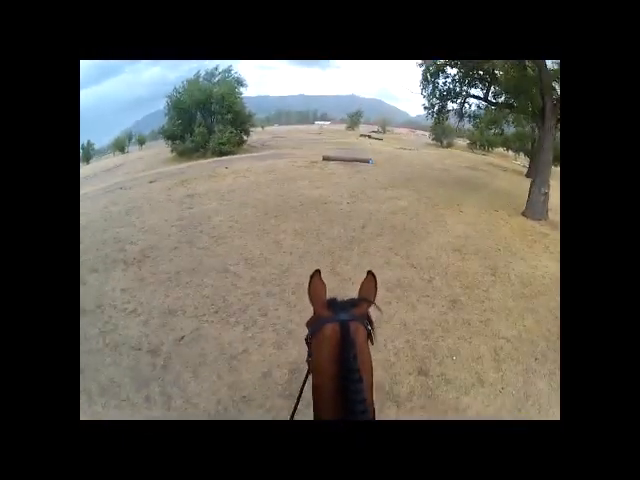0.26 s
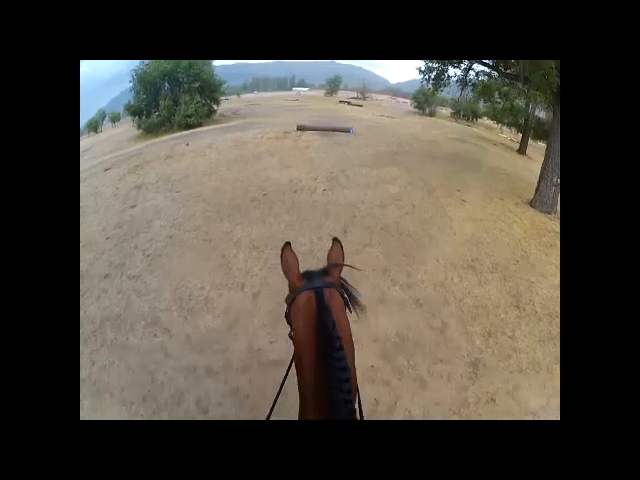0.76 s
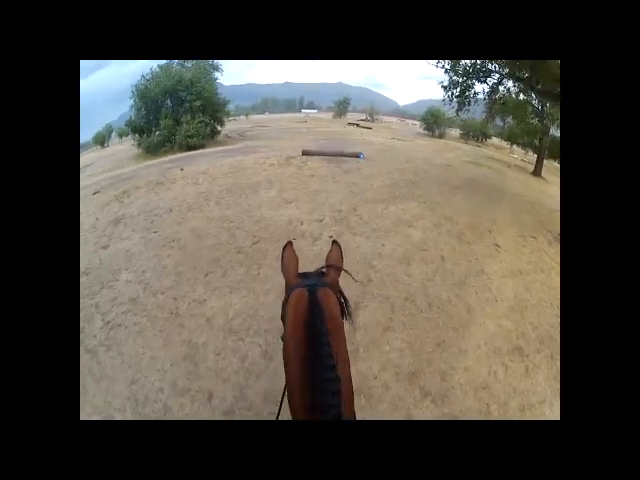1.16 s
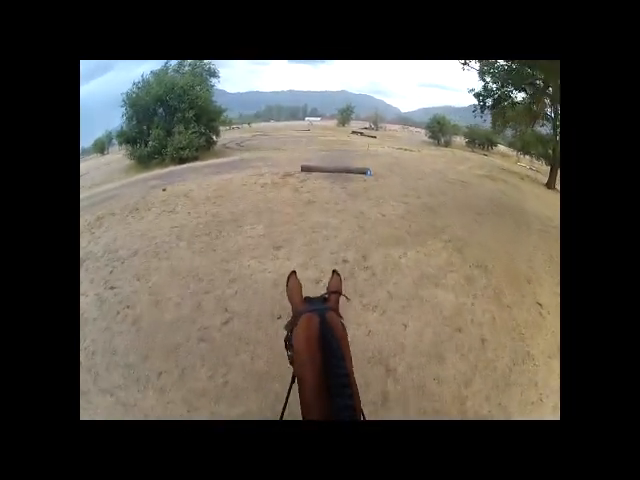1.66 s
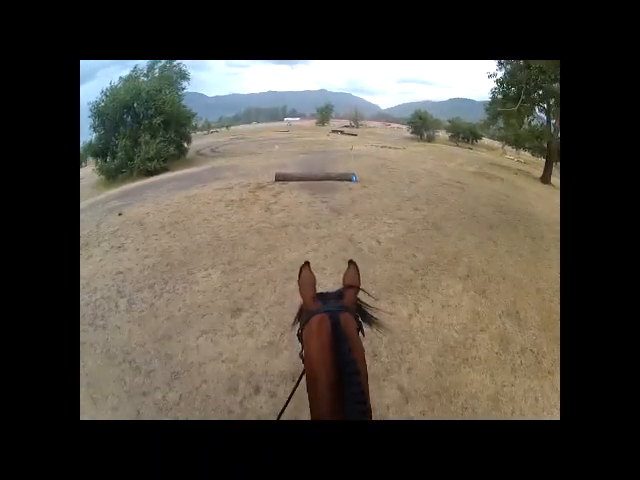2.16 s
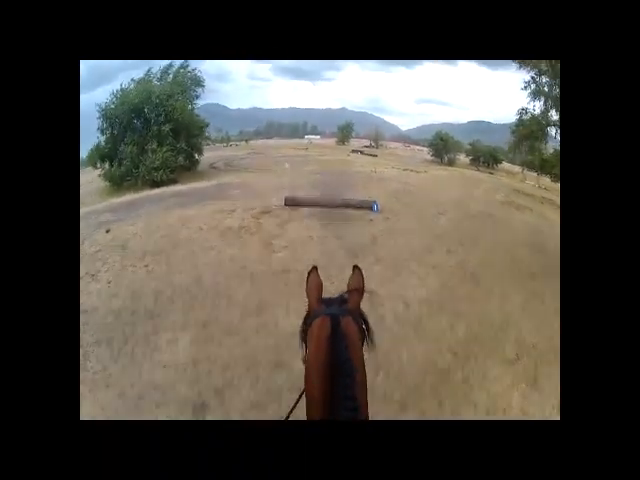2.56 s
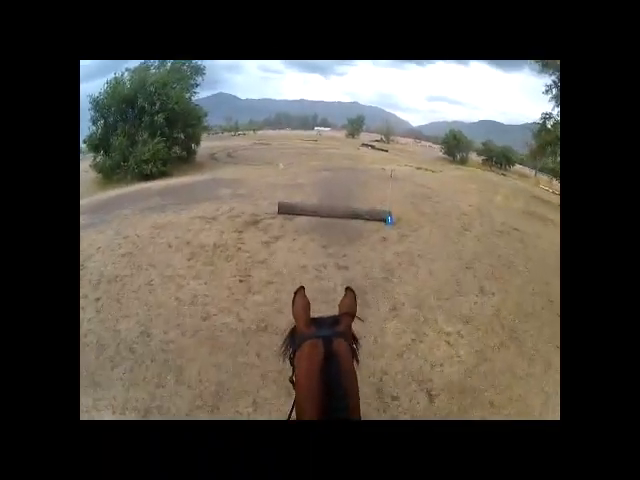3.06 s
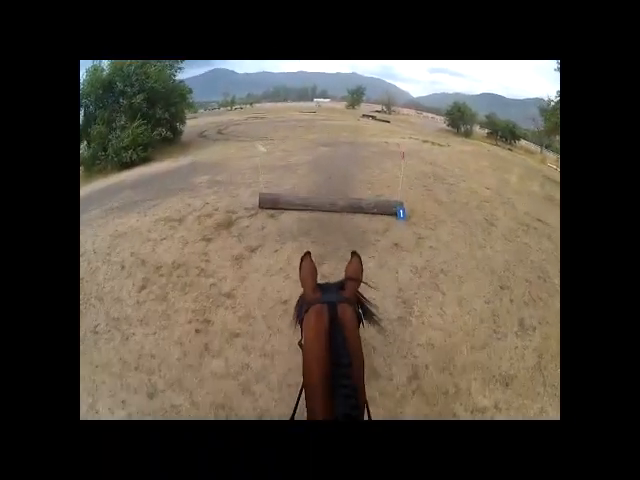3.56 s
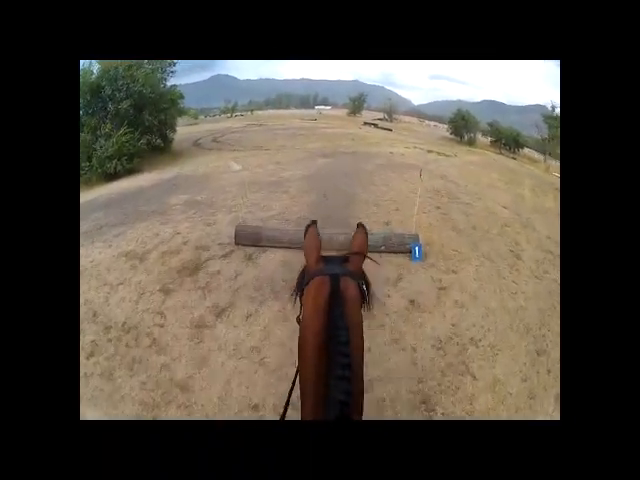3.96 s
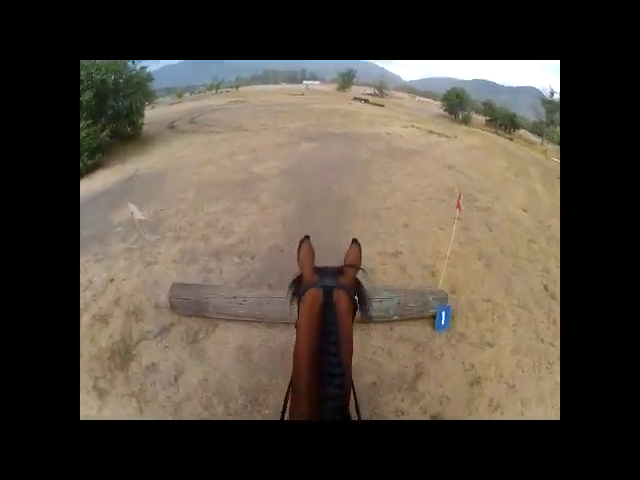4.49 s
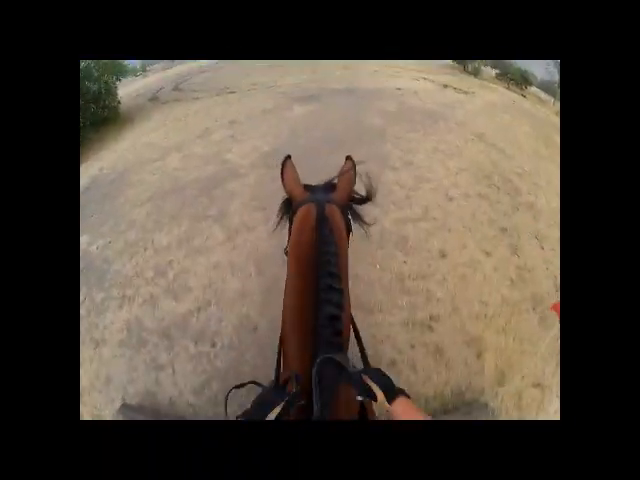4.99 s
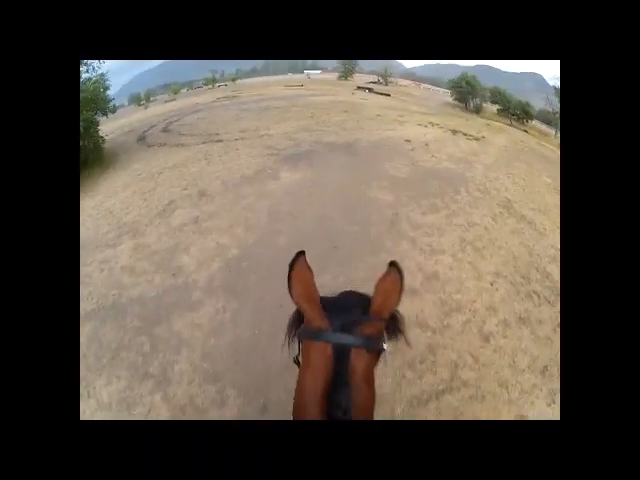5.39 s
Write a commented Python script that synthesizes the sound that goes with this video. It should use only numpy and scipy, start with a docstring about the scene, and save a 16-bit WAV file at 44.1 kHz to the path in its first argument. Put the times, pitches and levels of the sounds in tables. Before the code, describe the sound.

Outdoors, dry and without echo, heard in mono from a camera on the rider's helmet. Low rumble quickly drops to faint air with a barely audible electronic whine. A horse canters on hard ground, its main beats near 0.55, 1.25, 1.95, 2.65, 3.35 and 4.05 seconds: dull low thuds, a wandering bass sway as the helmet rocks, soft grit, and light footfalls between. Short hard knocks of the plastic camera case clack on the beats, crowding into a bright, loud rattle at 2.5-2.7, with strong single clacks around 3.3 and 4.07. Tiny dry stalks snap occasionally. At 4.7-4.95 the jump brings rattling knocks, a sharp gritty skid, heavy clustered thumps and a short spray of dirt. A brief lull follows, then another firm thud near 5.2, a tiny double metallic tack clink at 5.38, and low rumble fading slightly to the end at about 5.6.

```python
"""Hard dry ground: a horse canters and jumps a log, heard from a camera on the rider's helmet.
Strides are short dull pushes that swell and fade evenly; each also sways the helmet as a wandering low tone.
Knocks ring the modes of the plastic camera case, with a thump behind each.
Grit and dirt are sparse random cracks under swells; the tack clinks as damped partials after the landing.
Wind and helmet sway rumble as low shaped noise over steady air, with a faint electronic whine."""
import sys
import numpy as np
from scipy import signal
from scipy.fft import rfft, irfft
from scipy.io import wavfile
from scipy.ndimage import uniform_filter1d

SR = 44100
rng = np.random.default_rng(int(sys.argv[2]) if len(sys.argv) > 2 else 0)


def generate_wav(signal):
    """Clip the signal to [-1, 1] and save it as 16-bit WAV at the path in sys.argv[1]."""
    frames = np.transpose(np.atleast_2d(signal))
    scaled = np.clip(frames, -1, 1) * 32767
    pcm = np.round(scaled).astype(np.int16)
    wavfile.write(sys.argv[1], SR, pcm)


N = 248283

# whine of the camera's electronics: (frequency [Hz], rms level [dB])
WHINE_TONES = [(5040, -86.5), (5088, -86.5), (6912, -90.5), (6960, -88)]
# steady air spectrum: (frequency [Hz], relative level [dB])
AIR_SPECTRUM = [(20, -13), (45, -9), (80, -10.5), (150, -11), (260, -15), (450, -22.5), (900, -28),
                (1600, -31.5), (2500, -31.5), (4000, -37), (5200, -40.5), (6000, -51.5), (7000, -42.5),
                (9000, -42), (11500, -49)]
AIR_RMS_DB = -58.5
# low rumble of wind and helmet sway over time: (time [s], rms level [dB])
RUMBLE_LEVELS = [(0, -34.5), (.15, -53), (2, -52), (2.5, -44.5), (3.2, -51), (3.5, -42.5), (3.8, -53),
                 (4.3, -51.5), (4.6, -40.5), (5.3, -39), (5.63, -45.5)]
# rumble spectrum: (frequency [Hz], relative level [dB])
RUMBLE_SPECTRUM = [(8, -8), (20, -3), (42, -5), (60, -8), (90, -25), (200, -30), (500, -44), (2000, -70.5)]

# clinks of the tack: (time [s], peak level [dB])
CLINK_EVENTS = [(5.378, -29), (5.3794, -23.5), (5.389, -31.5)]
# buckle partials: (frequency [Hz], relative level [dB], 60 dB decay time [s])
BUCKLE_PARTIALS = [(1932, 9, 0.024), (2720, 4, 0.0078), (3560, 8.5, 0.0094), (5100, -33, 0.033),
                   (6960, -27, .03), (8330, -3, 0.016), (10000, -5.5, 0.025)]
# strap snap spectrum: (frequency [Hz], relative level [dB])
SNAP_SPECTRUM = [(500, -12), (1400, 2), (2000, -17), (2900, 8), (4100, -4), (6100, -39), (8300, -3),
                 (10500, -13), (11800, -47)]

# sprays of loose dirt at the landing: (peak time [s], level [dB], rise [s], fall [s])
SPRAY_EVENTS = [(4.889, -37.5, 0.011, 0.023), (5.218, -48, 0.0077, 0.017)]
# spray spectrum: (frequency [Hz], relative level [dB])
SAND_SPECTRUM = [(300, -7), (480, -21), (850, -2), (1300, -0.5), (2100, 0), (3100, -2), (4200, -9.5),
                 (5400, -14), (6200, -17), (7200, -15), (8900, -10), (11000, -20), (12300, -12)]
# grit spectrum: (frequency [Hz], relative level [dB])
GRIT_SPECTRUM = [(200, -7.5), (500, -18), (850, 7), (1400, -6.5), (2300, 3), (3100, -6), (4200, -15.5),
                 (6100, -34.5), (7500, -24.5), (9500, -10.5), (11200, -18.5), (12300, -31)]
# hooves skidding on the grit: (peak time [s], level [dB])
SKID_EVENTS = [(2.505, -46), (2.603, -46.5), (2.681, -31.5), (4.717, -50), (4.812, -19.5)]
SKID_RISE_S, SKID_FALL_S = 0.0083, 0.013
# dry stalks snapping: (time [s], level [dB])
STALK_SNAPS = [(1.089, -59), (3.477, -51), (3.853, -50), (3.885, -51.5), (4.223, -52.5), (4.454, -48.5),
               (5.55, -46.5)]
STALK_RISE_S, STALK_FALL_S = 0.00084, 0.0059

# canter strides: (main beat time [s], weight [dB], grit trim [dB], stretch of the delays [ratio])
STRIDE_EVENTS = [(.560, -2.5, 0.5, 0.95), (1.243, -3, -2.5, 0.92), (1.935, -.5, -0.5, .97),
                 (2.645, 1, 1, 0.98), (3.349, 0, -1, 1.25), (4.066, -1, -1.5, 0.96)]
# thuds in each stride: (delay before stretch [s], level before weight [dB], pitch [Hz], half length [s])
STRIDE_THUD_SHAPES = [(-.037, -23, 76, .0048), (.004, -17.5, 75.9, 0.0037), (.02, -22, 59.6, 0.0026),
                      (.045, -21.5, 86, .0042)]
# helmet rocking in each stride: (delay before stretch [s], level before weight [dB], rise [s], fall [s])
STRIDE_SWAY_SHAPES = [(-.017, -17, 0.021, 0.034), (.032, -21, 0.024, 0.055)]
# grit as hooves reach the ground, bear down and roll off:
# (delay before stretch [s], level before trim [dB], rise [s], fall [s])
STRIDE_CRUNCH_SHAPES = [(-.044, -52.5, 0.018, 0.014), (.005, -55.5, 0.026, 0.081),
                        (.035, -44.5, .009, .014)]
# light footfalls between main beats: (time [s], thud [dB], pitch [Hz], sway [dB], grit [dB])
LIGHT_STEPS = [(0.241, -31.5, 58, -30, -62), (.921, -35, 57, -30, -62), (1.614, -32, 52, -31, -83),
               (2.303, -32.5, 50.7, -27.5, -63.5), (2.986, -21.5, 109, -26.5, -56),
               (3.732, -30.5, 113, -30.5, -59), (4.403, -30.5, 79, -34.5, -61.5),
               (4.475, -31.5, 48.7, -26.5, -64), (5.617, -35, 73.6, -41.5, -57)]
STEP_SWAY_LAG_S, STEP_SWAY_RISE_S, STEP_SWAY_FALL_S = 0.0092, 0.051, 0.06
STEP_GRIT_RISE_S, STEP_GRIT_FALL_S = 0.037, 0.053
# footfalls and jolts of take-off and landing: (time [s], thud [dB], pitch [Hz], sway [dB], grit [dB])
JUMP_JOLTS = [(4.745, -31, 50, -25, -62.5), (4.805, -20.5, 78, -29, -44), (4.837, -12.5, 67, -22, -55),
              (4.878, -16, 107, -34, -42), (4.9, -10, 61, -25, -47), (4.944, -34, 60, -21.5, -56.5),
              (4.975, -27.5, 139, -43, -52.5), (5.1, -37, 57.5, -25.5, -65.5),
              (5.211, -13.5, 105.5, -32, -51.5), (5.239, -26, 56, -19.5, -60),
              (5.405, -38, 49.6, -32.5, -74)]
JUMP_RISE_S, JUMP_FALL_S = 0.021, 0.03
SWAY_HZ = 32.9
# earth around a thud: (frequency [Hz], relative level [dB])
EARTH_SPECTRUM = [(40, -16), (110, -7), (200, 1.5), (280, -4.5), (400, -14.5), (600, -29.5), (1500, -55.5),
                  (4000, -91)]
THUD_HALF_CYCLES = 0.21  # half length of thumps and lone thuds, in cycles of their pitch

# hard knocks of the case:
# (time [s], peak level [dB], brightness [dB], rattle trim [dB], thump peak [dB], thump pitch [Hz])
KNOCK_EVENTS = [(.512, -13.5, 4, -4.5, -19.5, 99), (0.5593, -11, 12.5, -3, -14.5, 112),
                (.597, -33, 6, -10, -29, 101), (1.2424, -10.5, 4, 0, -16.5, 124),
                (1.2828, -29, 7.5, -8, -27.5, 85), (1.893, -35.5, 9, -1, -31.5, 111.3),
                (1.9346, -10.5, 8.5, 2, -13, 145), (1.97, -30.5, -14, 0, -26, 110),
                (2.081, -32.5, 1, -1, -24.5, 154), (2.498, -4, 12, -10.5, -11.5, 135),
                (2.513, -15, 3, -2.5, -17, 138), (2.5891, -16.5, -6, 4, -29.5, 90.5),
                (2.644, -13.5, 4.5, 2, -16, 135), (2.674, -15, -12, 2, -14.5, 73.6),
                (2.6802, -12, 7.5, -7, -23, 100), (2.69, -24, 7, -2, -11, 166),
                (2.973, -36, -1, -2, -35, 112), (2.983, -33.5, 1, 9, -32.5, 110),
                (3.305, -5.5, 3.5, -14.5, -13.5, 99.7), (3.348, -14, 6, 9, -16, 130.6),
                (4.0655, -5.5, 6, -8.5, -18.5, 106), (4.0998, -21.5, -5, -1, -24, 95),
                (4.719, -17.5, 3, -4.5, -23, 128.7), (4.7924, -13, -2.5, -9.5, -27, 89.7),
                (4.8019, -17, -8, 8, -23, 85), (4.81, -17.5, 15, -18, -29, 100),
                (4.825, -19, 4, -10, -17, 125), (5.086, -35.5, 6, -3, -38.5, 242),
                (5.195, -34, 13, -8, -23.5, 136)]
# case resonances: (nominal frequency [Hz], skirt width [Hz], relative level [dB])
CASE_MODES = [(916, 209, 8.5), (1211, 133.7, -3.5), (735.7, 72, -6), (250, 170, -14.5), (1762, 265, -14.5),
              (2350, 260, -26.5), (2840, 233, -24), (3662, 338, -30), (4710, 880, -49), (7200, 409, -49.5),
              (8350, 510, -32.5), (9374, 170, -24.5), (10110, 247, -24), (11020, 430, -18.5)]
# chatter of the plastic surfaces: (frequency [Hz], relative level [dB])
RATTLE_SPECTRUM = [(300, -10), (1000, -10), (2000, 1.5), (12000, -4.5)]
KNOCK_HZ, KNOCK_HZ_PER_DB = 955.7, 3  # first case mode at 0 dB peak; softer knocks ring lower
THUMP_DELAY_S = 0.0047

EDGE_HZ = 12200


def amp(db):
    """Decibels to amplitude."""
    return 10 ** (np.asarray(db) / 20)


def evened(x):
    """Scales x to rms 1."""
    return x / np.sqrt(np.mean(x ** 2) + 1e-20)


def add(mix, time_s, sound):
    """Mixes a sound in at a time, cut at the end of the mix."""
    part = mix[max(round(time_s * SR), 0):][:len(sound)]
    part += sound[:len(part)]


def seconds(size):
    """Time axis of size samples."""
    return np.arange(size) / SR


def coloured(x, points):
    """Filters x by (frequency [Hz], level [dB]) points, then scales to rms 1."""
    hz, db = np.transpose(points)
    f = np.fft.rfftfreq(len(x), 1 / SR)
    gain = amp(np.interp(np.log(f + 1), np.log(hz), db))
    return evened(irfft(rfft(x) * gain, len(x)))


def sparse_grains(grains_per_s):
    """Random cracks at a mean rate."""
    return rng.standard_normal(N) * (rng.random(N) < grains_per_s / SR)


def causal(gain):
    """Minimum-phase impulse response: starts at once, then rings out."""
    log_gain = np.log(np.maximum(gain, 1e-5))
    circle = np.concatenate([log_gain, log_gain[-2:0:-1]])
    return np.fft.ifft(np.exp(np.conj(signal.hilbert(circle)))).real


def swell(time_s, rise_s, fall_s, steepness):
    """Envelope that grows to 1 at time_s and dies away."""
    t = seconds(N)
    distance = np.maximum((time_s - t) / rise_s, (t - time_s) / fall_s)
    return np.exp(-np.minimum(distance, 20) ** steepness)


def whine():
    """Four thin electronic tones in two pairs, 48 Hz apart within each."""
    out = np.zeros(N)
    for hz, db in WHINE_TONES:
        out += amp(db) * evened(np.sin(2 * np.pi * (hz * seconds(N) + rng.random())))
    return out


def wind():
    """Low rumble of wind and helmet sway over a faint steady rush of air."""
    rumble_db = np.interp(seconds(N), *np.transpose(RUMBLE_LEVELS))
    rumble = amp(rumble_db) * coloured(rng.standard_normal(N), RUMBLE_SPECTRUM)
    air = amp(AIR_RMS_DB) * coloured(rng.standard_normal(N), AIR_SPECTRUM)
    return rumble + air


def tack(snap_db=2, snap_decay_s=0.0039, size=4096):
    """A small metal buckle snaps against its strap and bounces: damped partials plus a noise snap."""
    out, t = np.zeros(N), seconds(size)
    for time_s, peak_db in CLINK_EVENTS:
        ring = np.zeros(size)
        for hz, db, t60_s in BUCKLE_PARTIALS:
            ring += amp(db) * 1e-3 ** (t / t60_s) * np.sin(2 * np.pi * (hz * t + rng.random()))
        snap = coloured(rng.standard_normal(size), SNAP_SPECTRUM) * np.exp(-t / snap_decay_s)
        clink = ring + amp(snap_db) * snap
        add(out, time_s, amp(peak_db) * clink / abs(clink).max())
    return out


def spray(grains_per_s=4500):
    """Fine grains fly in short hissing sheets that start and stop quickly."""
    level = sum(amp(db) * swell(s, rise, fall, steepness=2.4) for s, db, rise, fall in SPRAY_EVENTS)
    return level * coloured(sparse_grains(grains_per_s), SAND_SPECTRUM)


def crunches():
    """Hoof, skid and stalk crunches as (time [s], level [dB], rise [s], fall [s])."""
    rows = []
    for s, _, trim_db, stretch in STRIDE_EVENTS:
        for delay, db, rise, fall in STRIDE_CRUNCH_SHAPES:
            rows.append((s + stretch * delay, db + trim_db, rise, fall))
    rows += [(s, db, STEP_GRIT_RISE_S, STEP_GRIT_FALL_S) for s, *_, db in LIGHT_STEPS]
    rows += [(s, db, JUMP_RISE_S, JUMP_FALL_S) for s, *_, db in JUMP_JOLTS]
    rows += [(s, db, SKID_RISE_S, SKID_FALL_S) for s, db in SKID_EVENTS]
    return rows + [(s, db, STALK_RISE_S, STALK_FALL_S) for s, db in STALK_SNAPS]


def grit(grains_per_s=2200, smooth=0.46, level_db=-1, clump_samples=200, clump_db=4.0):
    """Dense tiny cracks of dry soil and grass, in clumps that swell and fade under each hoof."""
    power = np.zeros(N)
    for s, db, rise, fall in crunches():
        power += (amp(db) * swell(s, rise, fall, steepness=1.34)) ** 2
    cracks = evened(sparse_grains(grains_per_s))
    clumps = amp(clump_db * evened(uniform_filter1d(rng.standard_normal(N), clump_samples)))
    texture = coloured(clumps * cracks + smooth * rng.standard_normal(N), GRIT_SPECTRUM)
    return amp(level_db) * np.sqrt(power) * texture


def sways():
    """Helmet rockings as (time [s], level [dB], rise [s], fall [s]): slow on steps, abrupt in the jump."""
    rows = []
    for s, weight_db, _, stretch in STRIDE_EVENTS:
        for delay, db, rise, fall in STRIDE_SWAY_SHAPES:
            rows.append((s + stretch * delay, db + weight_db, rise, fall))
    rows += [(s + STEP_SWAY_LAG_S, db, STEP_SWAY_RISE_S, STEP_SWAY_FALL_S)
             for s, _, _, db, _ in LIGHT_STEPS]
    return rows + [(s, db, JUMP_RISE_S, JUMP_FALL_S) for s, _, _, db, _ in JUMP_JOLTS]


def sway(wander=0.3, level_db=-1, smooth_samples=1100):
    """The helmet dips at each footfall and rocks on its padding at an uneven low rate."""
    noise = uniform_filter1d(rng.standard_normal(N), smooth_samples)
    drift = evened(uniform_filter1d(noise, smooth_samples))
    turns = np.cumsum(SWAY_HZ * (1 + wander * drift)) / SR
    out = np.zeros(N)
    for s, db, rise, fall in sways():
        # each rocking is at its lowest at time s
        rocking = -np.sqrt(2) * np.cos(2 * np.pi * (turns - np.interp(s, seconds(N), turns)))
        envelope = uniform_filter1d(swell(s, rise, fall, steepness=1.25), smooth_samples // 4)
        out += amp(db + level_db) * envelope * rocking
    return out


def thuds():
    """Stride, footfall and knock thuds as (time [s], push peak [dB], pitch [Hz], half length [s])."""
    rows = []
    for s, weight_db, _, stretch in STRIDE_EVENTS:
        for delay, db, hz, half_s in STRIDE_THUD_SHAPES:
            rows.append((s + stretch * delay, db + weight_db, hz, half_s))
    rows += [(s, db, hz, THUD_HALF_CYCLES / hz) for s, db, hz, _, _ in LIGHT_STEPS + JUMP_JOLTS]
    return rows + [(s + THUMP_DELAY_S, db, hz, THUD_HALF_CYCLES / hz) for s, *_, db, hz in KNOCK_EVENTS]


def footfalls(earth_db=-19, spread=2.0, size=8192):
    """Each thud is a dull push and rebound with a longer, coarse rumble of earth around it."""
    out, t = np.zeros(N), seconds(size) - size / 2 / SR
    for time_s, peak_db, hz, half_s in thuds():
        push = np.sin(2 * np.pi * hz * t) / np.cosh(t / half_s)
        earth = coloured(rng.standard_normal(size), EARTH_SPECTRUM) / np.cosh(t / (spread * half_s))
        thud = push / abs(push).max() + amp(earth_db) * earth
        add(out, time_s + t[0], amp(peak_db) * thud)
    return out


def knocks(scatter_db=3.03, rattle_decay_s=0.0017, skirt_power=1.864, chatter_db=4,
           top_share=0.45, size=2048, main_count=3):
    """A sharp contact and a brief rattle ring the case; a harder blow raises its main modes."""
    out, t, f = np.zeros(N), seconds(size), np.fft.rfftfreq(size, 1 / SR)
    mode_hz, width_hz, mode_db = np.transpose(CASE_MODES)
    is_main = np.arange(len(CASE_MODES)) < main_count
    # brightness acts fully on the middle modes, partly on the top ones
    lift = np.interp(mode_hz, [1300, 1700, 5000, 8000], [0, 1, 1, top_share])
    for time_s, peak_db, bright_db, rattle_db, _, _ in KNOCK_EVENTS:
        first_hz = KNOCK_HZ + KNOCK_HZ_PER_DB * peak_db
        centre_hz = mode_hz * np.where(is_main, first_hz / mode_hz[0], 1)
        scatter = scatter_db * rng.standard_normal(len(CASE_MODES))
        gain = amp(mode_db + lift * (bright_db + scatter))
        offset = (f[:, None] - centre_hz) / width_hz
        ring = causal((gain / (1 + offset ** 2) ** skirt_power).sum(1))
        # the surfaces chatter for a few milliseconds after they meet
        rattle = coloured(rng.standard_normal(size), RATTLE_SPECTRUM)
        rattle *= np.sqrt(t) * np.exp(-t / rattle_decay_s)
        chatter = signal.fftconvolve(ring, rattle / np.linalg.norm(rattle))[:size]
        knock = ring + amp(rattle_db + chatter_db) * chatter
        add(out, time_s, amp(peak_db) * knock / abs(knock).max())
    return out


def scene():
    """Sums all layers into one channel."""
    background = whine() + wind()
    ground = spray() + grit() + footfalls()
    return (background + tack() + ground + sway() + knocks())[None]


def record(dry):
    """Band limit of the camera: a linear-phase low-pass."""
    low_pass = signal.firwin(255, EDGE_HZ, window=("kaiser", 9), fs=SR)
    return signal.oaconvolve(dry, low_pass[None], "same")


dry = scene()
out = record(dry)
generate_wav(out)
```